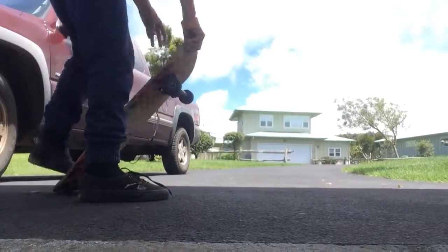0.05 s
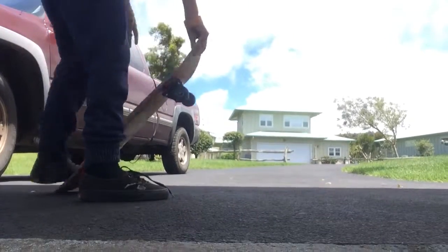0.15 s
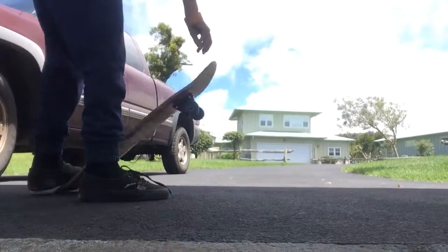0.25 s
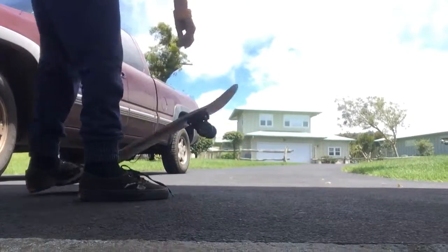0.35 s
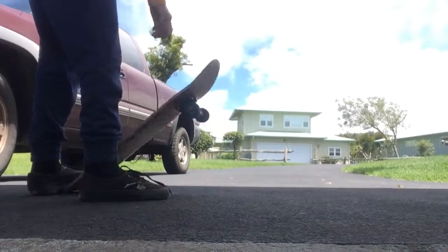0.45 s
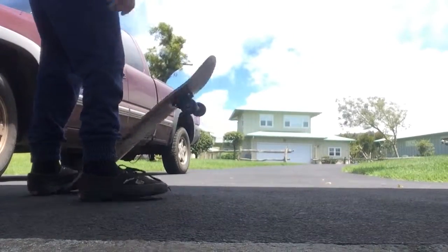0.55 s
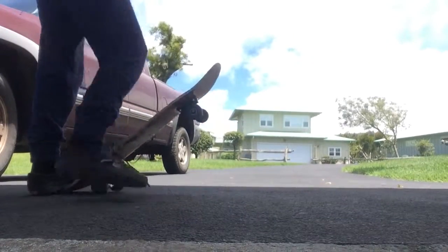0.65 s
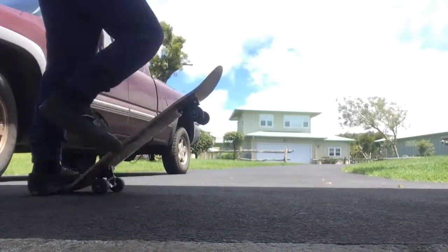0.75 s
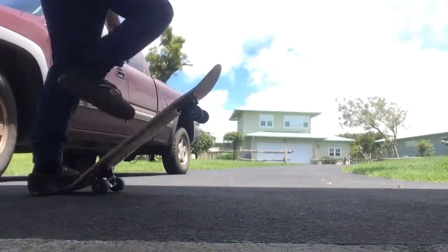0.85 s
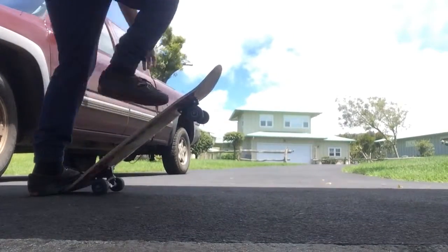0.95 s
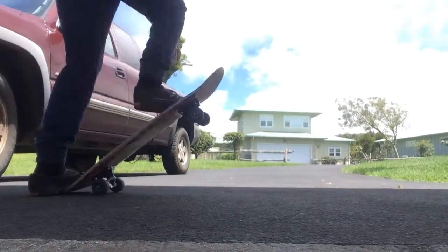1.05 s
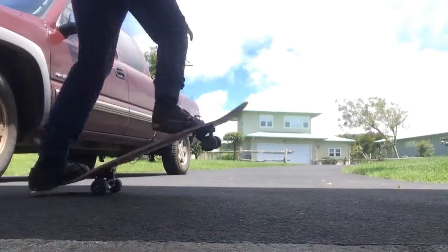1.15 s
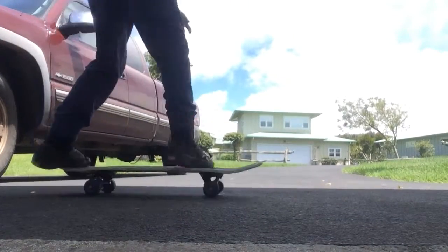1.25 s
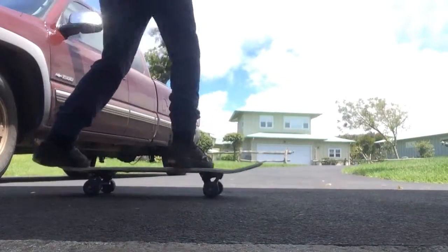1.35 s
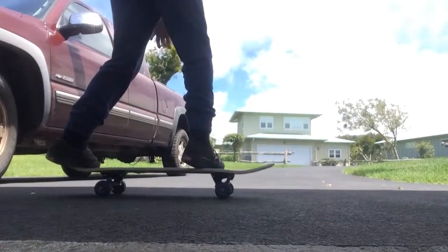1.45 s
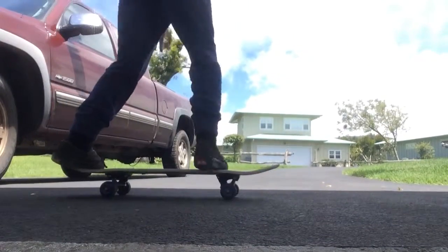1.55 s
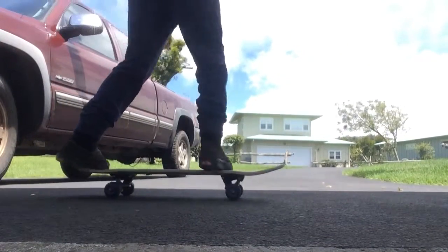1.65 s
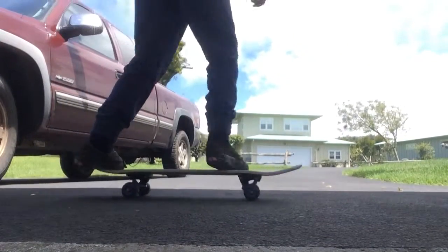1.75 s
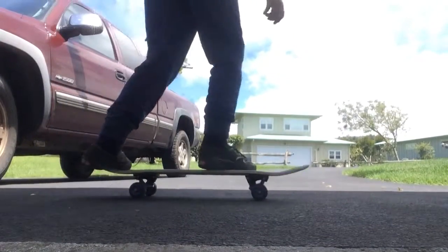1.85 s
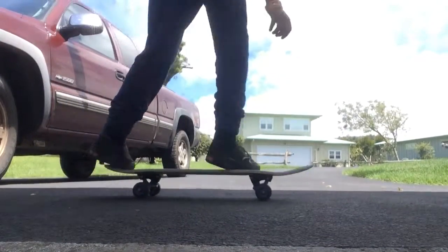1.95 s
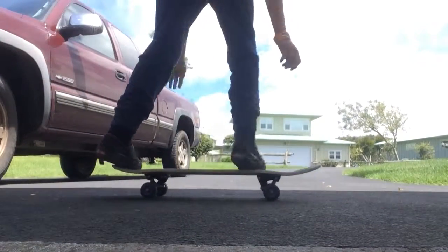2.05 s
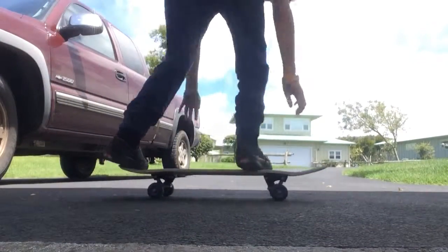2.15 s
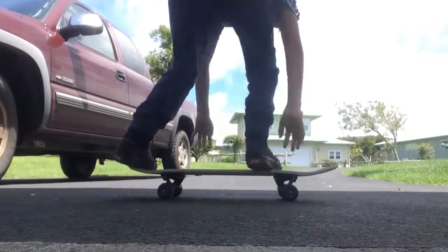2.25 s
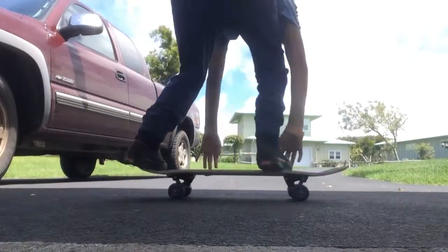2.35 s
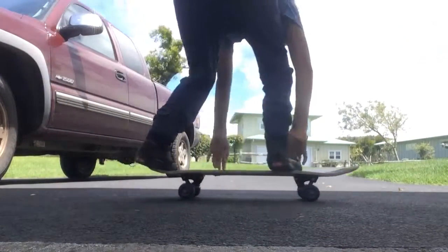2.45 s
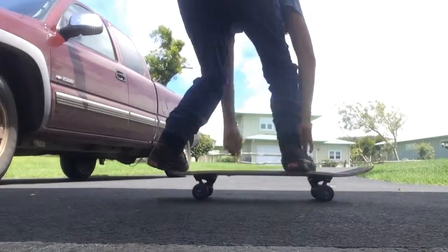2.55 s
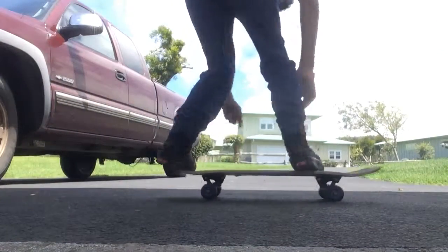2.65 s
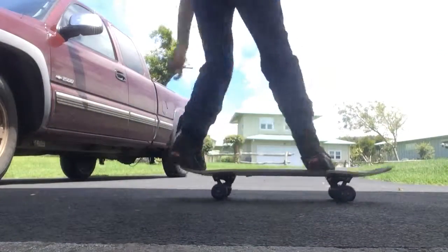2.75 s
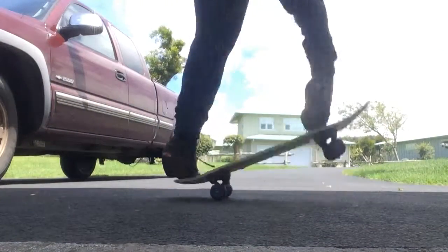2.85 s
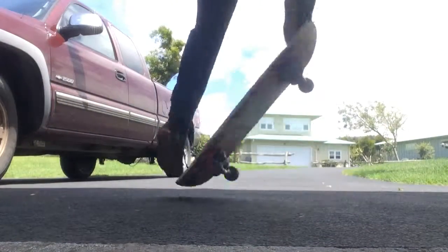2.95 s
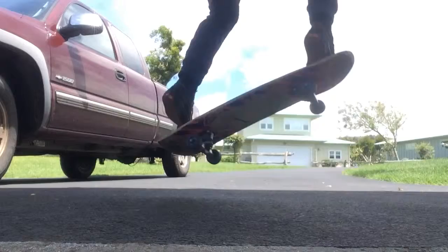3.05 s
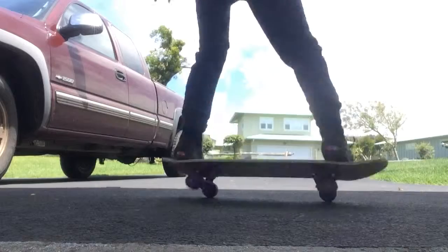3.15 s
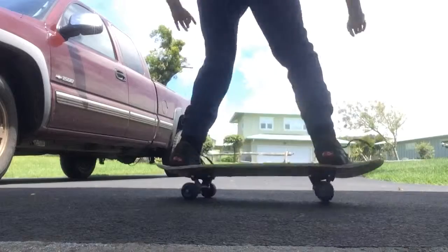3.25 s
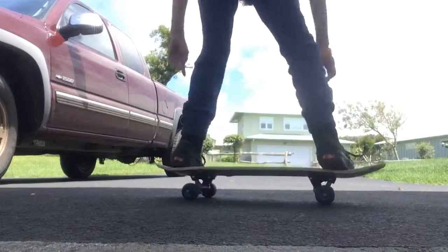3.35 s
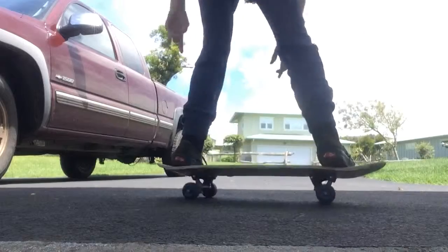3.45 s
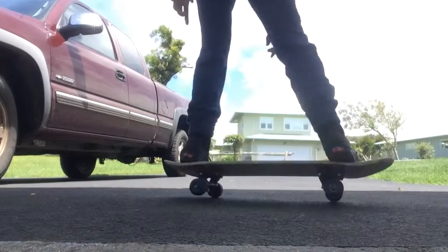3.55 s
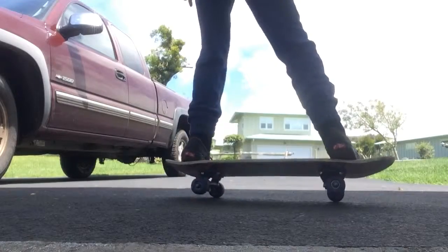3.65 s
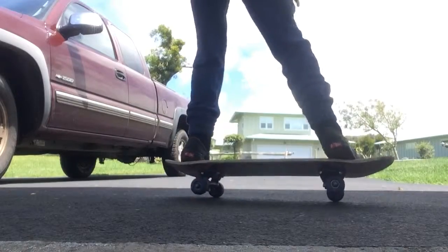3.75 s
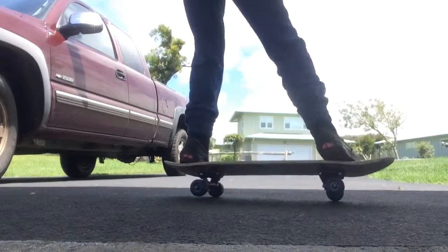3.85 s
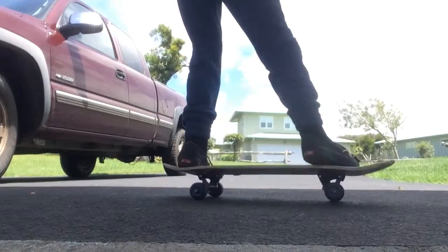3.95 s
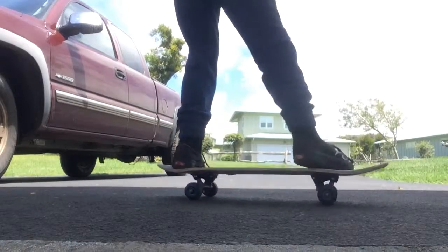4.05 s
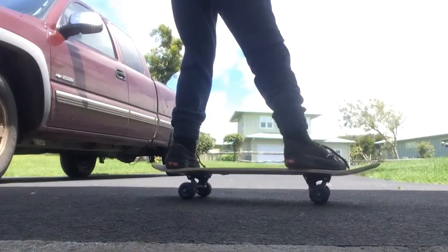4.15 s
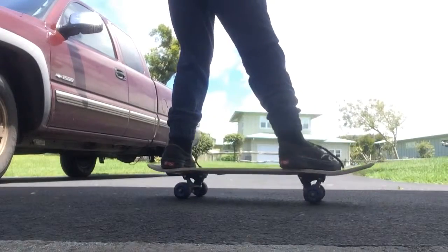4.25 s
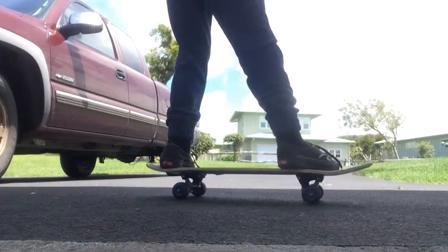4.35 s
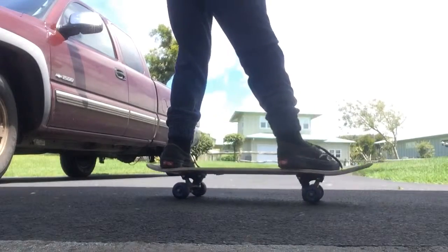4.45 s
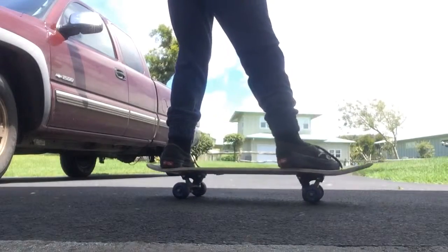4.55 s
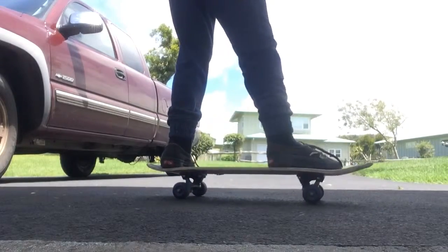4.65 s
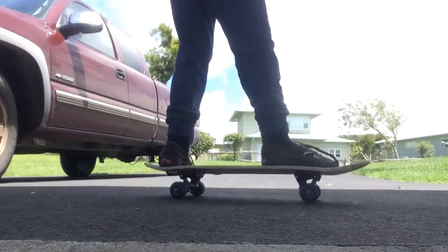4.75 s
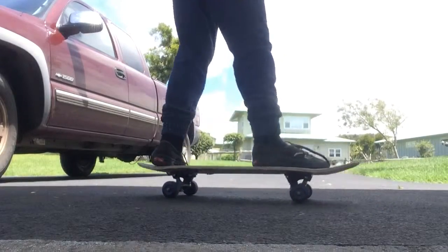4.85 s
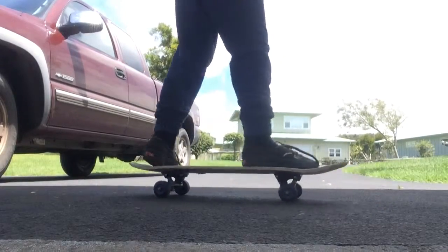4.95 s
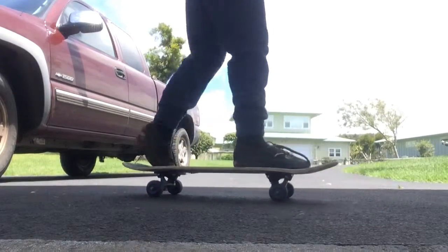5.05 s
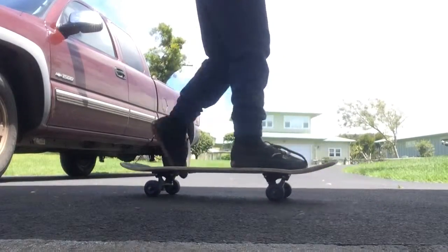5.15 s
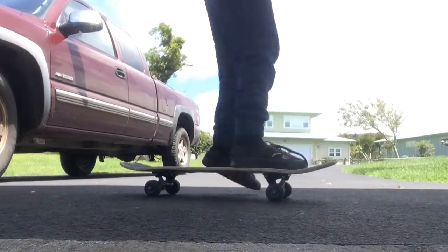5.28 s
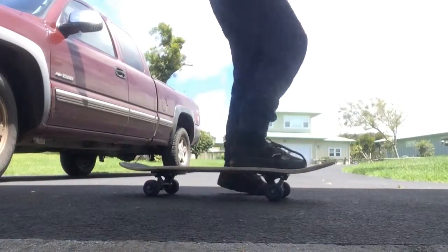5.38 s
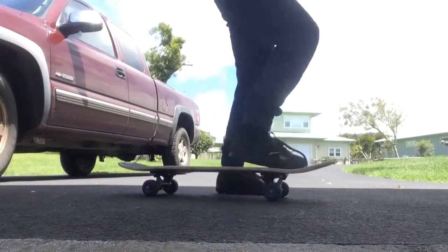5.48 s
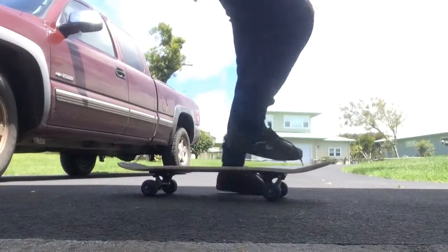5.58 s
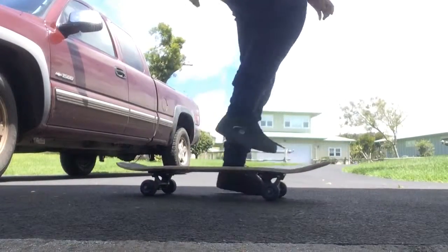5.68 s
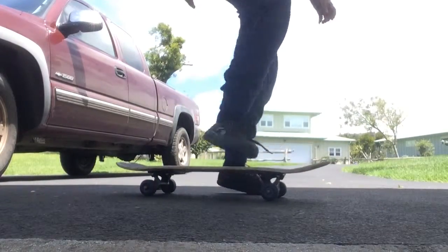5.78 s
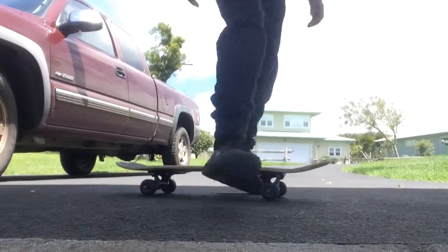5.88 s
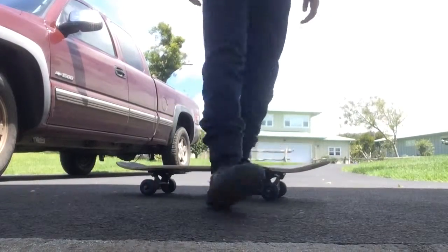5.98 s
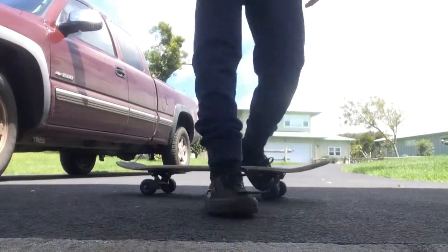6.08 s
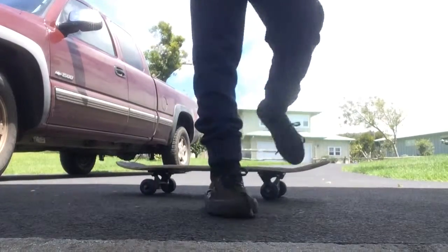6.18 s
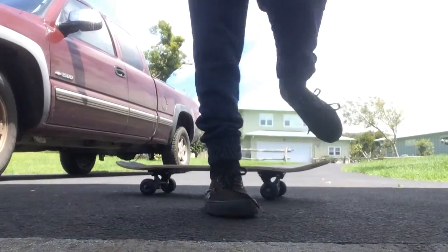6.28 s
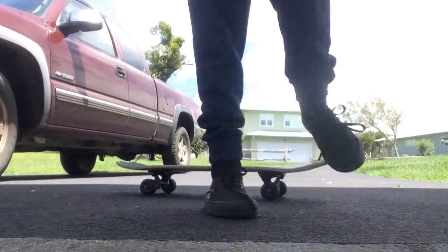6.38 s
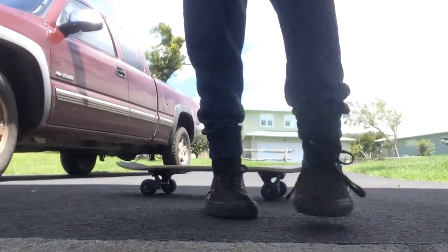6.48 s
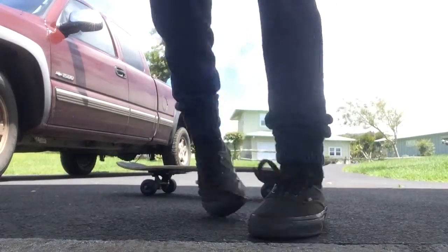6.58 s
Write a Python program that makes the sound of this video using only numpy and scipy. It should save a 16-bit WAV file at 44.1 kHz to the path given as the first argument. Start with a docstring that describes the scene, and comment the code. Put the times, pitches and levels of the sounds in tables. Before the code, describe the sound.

Outdoors on an asphalt drive, a microphone on the ground about a metre away hears a skateboard's tail knock and rattle, then the front wheels slap down. Shoes scuff the grip tape over a faint low roll while wind buffets the microphone. A sharp wooden pop, a brief airborne gap, and a hard, multiple-impact landing follow. Then it quietens to soft scuffs, low footfalls and a small bird chirping.

```python
"""A skateboard on an asphalt drive, a metre from a microphone on the ground: the tail knocks, the front wheels
slap down, the board rolls, a gust buffets the microphone, the board pops an ollie and lands hard, and the rider
steps off while a small bird chirps. Shoes scuff the grip tape throughout; faint echoes return from a parked truck
and houses. Blows are decaying modes and noise, scuffs, wheels and wind are shaped noise, the bird is swept sines.
The recorder's gain ducks after loud blows."""
import sys
import numpy as np
from scipy import signal
from scipy.fft import rfft, irfft
from scipy.io import wavfile
from scipy.ndimage import uniform_filter1d, minimum_filter1d

SR = 44100
rng = np.random.default_rng(int(sys.argv[2]) if len(sys.argv) > 2 else 0)


def wrap_up_sound(samples):
    """Save the sound to the file named by the first command line argument, as 16-bit audio."""
    columns = np.atleast_2d(samples).T
    # keep every value between -1 and 1, then stretch to whole-number steps
    tamed = np.clip(columns, -1, 1)
    steps = np.round(tamed * 32767).astype(np.int16)
    wavfile.write(sys.argv[1], SR, steps)


N = 291894
TIME = np.arange(N) / SR


def undb(db):
    """Decibels to gain."""
    return 10 ** (np.asarray(db) / 20)


def unit(x):
    """Scale to rms 1."""
    return x / np.sqrt(np.mean(x ** 2) + 1e-20)


def unit_attack(x):
    """Scale a hit to rms 1 over its first fiftieth of a second."""
    return x / np.sqrt(np.mean(x[:SR // 50] ** 2) + 1e-20)


def fade(t, t60):
    """Exponential free decay, 60 dB in t60 seconds."""
    return np.exp(-np.log(1000) * t / max(t60, 1e-3))


def band(x, lo_hz, hi_hz, order=3):
    """Causal Butterworth band-pass."""
    edges_hz = [lo_hz, min(hi_hz, SR / 2 - 100)]
    return signal.sosfilt(signal.butter(order, edges_hz, "band", fs=SR, output="sos"), x)


def colour(x, points):
    """Minimum-phase filter with a (f/Hz, gain/dB) outline."""
    hz, db = np.transpose(points)
    size = 2048
    grid_hz = np.arange(size // 2 + 1) * SR / size
    gain_db = np.interp(np.log(grid_hz + 1), np.log(hz), db)
    cepstrum = irfft(np.log(undb(gain_db)))
    # fold the cepstrum to make the response causal
    cepstrum[1:size // 2] *= 2
    cepstrum[size // 2 + 1:] = 0
    response = irfft(np.exp(rfft(cepstrum)))
    return signal.fftconvolve(x, response)[:len(x)]


def walk(count, rate):
    """Smoothed random steps, rate a second, rms 1."""
    hold = max(int(SR / rate), 1)
    steps = np.repeat(rng.standard_normal(count // hold + 1), hold)
    return unit(uniform_filter1d(steps, hold)[:count])


def grains(count, rate, rough_db):
    """Noise that comes in uneven little bursts, rms 1."""
    return unit(rng.standard_normal(count) * undb(rough_db * walk(count, rate)))


def rattle(count, rate):
    """Lone clicks of uneven size and random sign, on average rate a second, rms 1."""
    clicks = rng.random(count) < rate / SR
    return unit(clicks * rng.choice([-1, 1], count) * (.5 + rng.random(count)))


def swell(x, length):
    """A smooth rise and fall of a sound of rms 1: four lengths in all, above half height for one."""
    u = np.linspace(-2, 2, min(int(4 * length * SR), len(x)))
    window = 1 / np.cosh(2 * np.arccosh(2) * u)
    return unit(x[:len(u)] * window) * np.sqrt(np.mean(window ** 2))


def add(out, s, x):
    """Mix x in at time s."""
    i = max(int(s * SR), 0)
    out[i:i + len(x)] += x[:max(N - i, 0)]


def blow(wood_db, thud_db, clack_db, metal_db, wood_hz, clack_hz, t60, push_db, bite_db):
    """One contact: a sharp push, then the deck's modes and a dense chatter of wheels and hardware."""
    # plywood deck on its trucks: f/Hz, level/dB, t60/s
    deck = [(179, -6.5, 0.13), (239, -7.5, 0.22), (334, 7, 0.097), (378, -3, 0.14), (444, -17, 0.15),
            (550, 1, 0.085), (572.4, 2, 0.11), (648, 1, 0.12), (701, 4, 0.076), (749, -1.5, 0.16),
            (837, 2.5, 0.17), (947, 3, 0.13), (1140, -11, 0.22), (1298, -4, 0.14), (1547, 0, 0.13),
            (1568, -1.5, 0.12), (1680, -4, 0.068), (1978, -10.5, 0.074), (2110, 0.5, 0.083),
            (2250, -7, 0.15), (2326, -11, 0.13), (2900, -17, 0.14), (3070, -19, 0.066)]
    # dense overtones of deck, wheels and hardware: f/Hz, gain/dB
    dense = [(60, -15), (130, 6.5), (400, 6), (900, -4.5), (1100, -4.5), (1550, -6.5), (2200, -10),
             (2700, -13.5), (3500, -20.5), (4800, -18.5), (6800, -20.5), (9000, -17), (11500, -17),
             (15000, -18.5)]
    metal_ring_hz = 11500  # one bright steel ring, shared by all blows for simplicity
    t = np.arange(SR // 2) / SR

    hz, db, mode_t60 = np.transpose(deck)[:, :, None]
    strayed_hz = hz * (1 + 0.0016 * rng.standard_normal(hz.shape))  # each mode strays slightly at random
    phase = 2 * np.pi * (strayed_hz * t + rng.random(hz.shape))
    modes = (undb(db) * np.sin(phase) * np.exp(-np.log(1000) * t / mode_t60)).sum(axis=0)

    clicks = band(rattle(len(t), rate=710), 6300, 11800, order=1)
    hardware = grains(len(t), rate=790, rough_db=0.5) + 1.3 * clicks
    # steel cracks at the instant of contact
    crack = band(rng.standard_normal(len(t)), 8300, 16650, order=2) * fade(t, 0.018)
    chatter = colour(hardware * fade(t, t60) + 2.1 * crack, dense)
    # the contact lasts a fraction of a millisecond, so the push is duller than the rattle
    push = band(colour(signal.unit_impulse(len(t)), dense), 65, 2200, order=1)
    x = undb(-5.5) * unit_attack(modes) + unit_attack(chatter) + undb(push_db) * unit_attack(push)

    # where the board is struck decides which wood and clack resonances answer most
    for ring_hz, boost in ((wood_hz, .9), (clack_hz, .9), (metal_ring_hz, .6)):
        x = x + boost * band(x, ring_hz / 1.058, ring_hz * 1.056, order=1)
    # bare wood on asphalt bites; soft wheels and soles dull the top of the clack
    x = colour(x, [(2350, 0), (2650, bite_db), (4000, bite_db), (5500, 0)])

    # the rider's weight gives the thud, plywood the knock and clack, steel the bright edge
    edges_hz = [75, 380, 1150, 4400, 16000]
    spectrum, f = rfft(x), np.arange(len(x) // 2 + 1) * SR / len(x)
    outline = []
    for part_db, lo, hi in zip((thud_db, wood_db, clack_db, metal_db), edges_hz, edges_hz[1:]):
        attack = np.std(irfft(spectrum * ((f > lo) & (f < hi)))[:SR // 50])
        lift_db = part_db - 20 * np.log10(attack)
        outline += [(lo * 1.2, lift_db), (hi / 1.2, lift_db)]
    return colour(x, outline)


def board():
    """All knocks, the pop and the landing, plus short noise ticks of grit and loose washers."""
    # blows on the board: t/s, wood/dB, thud/dB, clack/dB, metal/dB, wood ring f/Hz, clack ring f/Hz,
    # chatter t60/s, first push re chatter/dB, bite of a hard contact/dB
    blows = [ (.152, -45, -55, -51, -66, 805, 1440, .23, -0.5, 2),
             (0.3345, -28, -32.5, -28, -49, 400, 1260, 0.093, -16, -2.5),
             (0.3419, -30, -33, -30.5, -39.5, 870, 1780, .13, -11, 1),
             (.514, -26, -41, -34, -44, 940, 1290, 0.18, -1, 1),
             (.537, -38, -51, -35.5, -52, 453, 1600, 0.13, -2, -4),
             (.63, -37.5, -43, -39, -46.5, 920, 2250, .25, -21, 2),
             (0.6748, -37.5, -41, -35, -44.5, 484, 1580, 0.037, 8.5, 6),
             (.686, -34, -44, -32, -42, 830, 2320, .14, -3.5, 1.5),
             (.878, -45, -47.5, -53, -81, 780, 1710, 0.23, -20, -15),
             (1.117, -37.5, -39.5, -34, -43.5, 786, 2470, 0.14, -8, -4),
             (1.3141, -23, -27.5, -23, -29, 800, 1550, 0.14, -2, -8),
             (1.3188, -16.5, -24, -19.5, -27, 770, 2150, 0.15, -14, 2),
             (2.9535, -13.5, -33, -12, -34, 900, 1670, 0.15, -9, 4.5),
             (2.9615, -14, -29, -30.5, -27.5, 670, 3400, 0.18, -5, 10),
             (3.158, -24, -29, -30, -40, 434, 2200, 0.29, -12, -2),
             (3.1665, -22, -30, -23.5, -33.5, 800, 3000, 0.16, -5, 3.5),
             (3.2132, -12.5, -15, -19, -24, 408, 2000, 0.2, -1, 1),
             (3.230, -17, -19, -22.5, -30, 327, 1620, 0.17, 2.5, 6.5),
             (3.2455, -12, -28.5, -28.5, -36, 690, 1570, 0.084, 3.5, 9),
             (3.422, -45.5, -63, -41.5, -52, 880, 1810, 0.094, 5, -1),
             (3.806, -53, -44, -64, -75, 950, 1300, .07, -2, -4),
             (3.9593, -30.5, -27.5, -30, -41.5, 720, 2250, .14, 2.5, 0),
             (6.035, -59, -59, -56.5, -70, 900, 2370, .06, 5, 12),
             (6.588, -44, -42.5, -60.5, -57, 600, 1790, 0.11, -23, -8)]
    # grit and loose washers: t/s, peak/dB
    ticks = [(0.3542, -18.5), (0.4256, -31.5), (.754, -35), (1.1073, -22.5), (1.474, -28), (1.7714, -29.5),
             (1.9594, -28), (2.1255, -29), (2.1662, -30.5), (2.199, -28.5), (2.8496, -14.5),
             (2.9985, -10.5), (3.3382, -22.5), (4.0854, -27), (4.1259, -25.5), (4.2094, -34.5)]
    tick_outline = [(300, 9), (1500, 5.5), (3000, 4.5), (6000, -9), (11500, -2), (15000, -4.5)]
    out, t = np.zeros(N), np.arange(SR // 10) / SR
    for s, *contact in blows:
        add(out, s, blow(*contact))
    for s, db in ticks:
        decay = fade(t, 0.0028) + undb(-19.5) * fade(t, 0.13)
        tick = colour(rng.standard_normal(len(t)) * decay, tick_outline)
        add(out, s, undb(db) * tick / np.abs(tick).max())
    return out


def scuffs_and_thuds():
    """Rubber catches on the grit of the tape and rings the board; weight comes down in low thuds."""
    # soles rubbing on grip tape: middle t/s, half-height length/s, rasp level/dB, loudest resonance f/Hz
    scuffs = [(1.19, 0.059, -41.5, 3230), (1.507, 0.049, -46, 3080), (1.645, .037, -60, 2960),
              (1.784, 0.042, -54.5, 3200), (1.841, 0.065, -52, 1700), (1.97, 0.032, -46.5, 3120),
              (2.184, 0.06, -54.5, 3070), (2.81, 0.03, -35, 3900), (2.855, 0.033, -39.5, 3100),
              (2.94, .045, -52, 2900), (4.073, 0.069, -49, 2000), (4.283, 0.04, -53.5, 2010),
              (4.702, 0.043, -48.5, 2690), (4.737, 0.025, -42, 1670), (5.142, 0.082, -51, 1780),
              (5.258, 0.053, -51, 1780), (5.405, .027, -48.5, 2500), (6.602, 0.02, -55, 2750)]
    # rasp outline: f/Hz, gain/dB
    rasp_outline = [(250, -13), (500, -2.5), (800, -1), (1100, -5), (1700, 0.5), (2400, -2.5), (3500, -2.5),
                    (4800, -8.5), (7000, -13), (15000, -58.5)]
    # hiss outline: f/Hz, gain/dB
    hiss_outline = [(1500, -40), (4000, 8), (7000, 7), (9500, 8.5), (12000, 15), (15000, 4)]
    # low thuds, the weight under some knocks and the slap, and shoes on deck and ground:
    # t/s, level/dB, f/Hz, press t60/s
    thuds = [(0.171, -39, 117, 0.11), (.337, -34.5, 114, 0.091), (.895, -50, 234, 0.12),
             (1.316, -19, 205.4, 0.11), (3.96, -30.5, 232, 0.066), (1.192, -45.5, 231, 0.17),
             (1.645, -40.5, 140, 0.16), (1.829, -37.5, 128, 0.048), (3.379, -23.5, 235, 0.023),
             (3.398, -32.5, 280, 0.021), (4.779, -36.5, 213, 0.094), (5.026, -43, 211, 0.089),
             (5.275, -36.5, 198, 0.093), (5.431, -39.5, 217, 0.068), (5.928, -45, 159, 0.046),
             (6.179, -33.5, 227, 0.05), (6.287, -31, 210, 0.11), (6.441, -31, 212, 0.1)]
    # hiss re rasp at 3 kHz resonance; a quicker rub rings higher and hisses more
    scuff_hiss_db, hiss_db_per_octave = -4, 3.5
    out, t = np.zeros(N), np.arange(SR // 3) / SR
    for s, length, rasp_db, ring_hz in scuffs:
        hiss_db = rasp_db + scuff_hiss_db + hiss_db_per_octave * np.log2(ring_hz / 3000)
        catches = grains(len(t), rate=440, rough_db=3.0) * undb(0.78 * walk(len(t), rate=123.4))
        catches = catches + 0.14 * rattle(len(t), rate=190)
        rasp = colour(catches, rasp_outline)
        rasp = rasp + 1.17 * band(rasp, ring_hz / 1.18, ring_hz * 1.03, order=1)
        hiss = colour(catches, hiss_outline)
        scuff = undb(rasp_db) * swell(rasp, length) + undb(hiss_db) * swell(hiss, length)
        add(out, s - 2 * length, scuff)
    for s, db, hz, t60 in thuds:
        tone = np.sin(2 * np.pi * hz * t) * fade(t, 0.8 * t60)
        press = band(rng.standard_normal(len(t)) * fade(t, t60), 59, 1.5 * hz)
        thud = band(unit_attack(tone) + 0.92 * unit_attack(press), 28, 360)
        add(out, s, undb(db) * unit_attack(thud))
    return out


def rolling():
    """Soft wheels murmur on the asphalt in step with their speed, and fall silent in the air."""
    # speed of the board: t/s, share of top speed
    speed = [(1.32, .05), (1.7, 0.92), (2.4, 0.8), (3.85, 0.87), (4.15, 0.29), (5.1, 0.39), (5.6, .02)]
    # wheels off the ground: from t/s, to t/s
    airborne_s = (2.96, 3.16)
    rumble_db, hiss_db = -52, -70  # at top speed
    hum_hz, hum_db = 208, -52.5  # low hum of the wheels, at top speed
    airborne = (TIME > airborne_s[0]) & (TIME < airborne_s[1])
    grounded = 1 - uniform_filter1d(1. * airborne, size=SR // 100)
    hum = band(rng.standard_normal(N), hum_hz / 1.123, hum_hz * 1.076, order=2)
    wheels = undb(hum_db) * unit(hum) + murmur_and_hiss(rumble_db, hiss_db)
    return grounded * np.interp(TIME, *np.transpose(speed)) * wheels


def echoes(x, t60, delay, top_hz):
    """Diffuse reflections: decaying grainy noise that builds up over the delay, unit energy."""
    t = np.arange(SR) / SR
    diffuse = band(grains(SR, rate=470, rough_db=4.0), 152, top_hz, order=1)
    response = diffuse * fade(t, t60) * (1 - np.exp(-(t / delay) ** 2))
    return signal.fftconvolve(x, response / np.sqrt(np.sum(response ** 2)))[:N]


def wind():
    """Turbulence on the microphone port: a light breeze, one gust and single eddies of various pitch."""
    # strongest eddies: middle t/s, half-height length/s, level/dB, upper edge f/Hz
    eddies = [(1.973, .03, -24, 210), (2.008, 0.021, -22.5, 555), (2.079, 0.032, -27.5, 263),
              (2.12, .013, -23.5, 487), (2.125, 0.039, -19.5, 152), (2.361, 0.096, -34, 137),
              (2.575, .04, -33, 111), (2.708, 0.061, -23.5, 154), (2.829, 0.05, -16.5, 116),
              (2.864, .019, -20.5, 520), (2.92, 0.059, -34, 190), (3.041, 0.035, -20.5, 178),
              (3.1, 0.027, -20, 152), (3.205, 0.027, -25, 129), (3.375, 0.037, -29, 154),
              (5.98, .1, -39.5, 160)]
    breeze_db = -53
    gust_s, gust_peak_db, rise_db_per_s, fall_db_per_s = 2.97, -34.5, 18, 40
    outline = [(15, -43), (30, -4), (55, 4), (110, 5.5), (200, -4.5), (330, -7.0), (800, -47.5)]
    out = unit(colour(grains(N, rate=18, rough_db=1.0), outline))
    gust_db = gust_peak_db - np.maximum(rise_db_per_s * (gust_s - TIME), fall_db_per_s * (TIME - gust_s))
    out *= np.hypot(undb(breeze_db), undb(gust_db))
    for s, length, db, edge_hz in eddies:
        eddy_outline = [(20, -30), (38, -17), (54, 1), (edge_hz, -3),
                        (2 * edge_hz, -21), (4 * edge_hz, -41), (16 * edge_hz, -70)]
        eddy = colour(rng.standard_normal(SR), eddy_outline)
        add(out, s - 2 * length, undb(db) * swell(eddy[SR // 2:], length))  # skip the filter's onset
    return out


def bird():
    """Calls of quick fluttering sweeps with a faint overtone, arriving by many paths through the trees."""
    # strokes of a call: t re loudest stroke/s, length/s, start f/Hz, middle f/Hz, end f/Hz, level re call/dB
    strokes = [(-.06, 0.071, 5300, 6220, 7300, -20), (-.02, 0.024, 3500, 4600, 4700, -7.5),
               (0, .03, 4950, 4530, 3720, -1), (0.027, .048, 3900, 4850, 4450, -9),
               (0.059, 0.033, 3200, 4020, 4740, -7)]
    # calls: t/s, level ahead of the paths/dB, pitch factor
    calls = [(4.78, -52.5, 1.03), (5.815, -63, 0.97), (6.186, -44, 1), (6.44, -60, .72)]
    out = np.zeros(N)
    for s, call_db, factor in calls:
        for offset, length, *pitches, db in strokes:
            u = np.linspace(0, 1, int(length * SR))
            sweep_hz = factor * np.polyval(np.polyfit([0, .5, 1], pitches, 2), u)
            hz = sweep_hz * (1 + 0.029 * walk(len(u), rate=900))
            flutter_db = 2.0 * walk(len(u), rate=290)
            loudness = undb(call_db + db + flutter_db) * np.sqrt(np.abs(np.sin(np.pi * u)))
            phase = 2 * np.pi * np.cumsum(hz) / SR
            add(out, s + offset, loudness * (np.sin(phase) + undb(-24) * np.sin(2 * phase)))
    early = echoes(out, t60=0.098, delay=0.0018, top_hz=9000)
    late = echoes(out, t60=0.26, delay=0.0077, top_hz=9000)
    return 0.91 * out + 0.65 * early + 0.38 * late


def murmur_and_hiss(rumble_db, hiss_db):
    """A low murmur under a fine hiss: two coloured grainy noises, each at its own level."""
    # murmur outline: f/Hz, gain/dB
    rumble_outline = [(71, -37), (120, -9.5), (207, -3.5), (316, -12), (489, -9.5), (537, -15),
                      (589, -11.5), (1120, -21), (1790, -23.5), (2990, -32.5), (5000, -40.5), (6500, -76),
                      (11000, -120)]
    # hiss outline: f/Hz, gain/dB
    air_outline = [(1760, -24), (3000, -0.5), (3510, -1.5), (5160, -4.5), (5610, -3.5), (7280, -6),
                   (13700, -6.5), (15500, -13)]
    rumble = unit(colour(grains(N, rate=28, rough_db=2.55), rumble_outline))
    hiss = unit(colour(grains(N, rate=89, rough_db=0.5), air_outline))
    return undb(rumble_db) * rumble + undb(hiss_db) * hiss


def outdoors():
    """The open air, low murmur and high hiss, growing slowly quieter."""
    murmur_start_db, murmur_fall_db_per_s = -51, .35
    air_start_db, air_fall_db_per_s = -62.5, 1.0
    return murmur_and_hiss(murmur_start_db - murmur_fall_db_per_s * TIME,
                           air_start_db - air_fall_db_per_s * TIME)


def scene():
    """Board and shoes close by with echoes from truck and houses, wind on the port, the bird further off."""
    near = board() + scuffs_and_thuds()
    far = undb(-37.5) * echoes(near, t60=0.48, delay=0.15, top_hz=4000)
    return (near + far + wind() + rolling() + outdoors() + bird())[None]


def gain_control(x):
    """Loud blows turn the gain down; it holds, then recovers. The detector rolls off below 200 Hz."""
    threshold_db, slope = -19, .5  # slope: share of any excess level taken off
    window_s, hold_s, release_s = 0.022, .25, 0.039
    power = uniform_filter1d(band(x, 200, 14500, order=2) ** 2, int(window_s * SR))
    level_db = 10 * np.log10(np.abs(power) + 1e-12)
    cut_db = -slope * np.maximum(level_db - threshold_db, 0)
    hold = int(hold_s * SR)
    held_db = minimum_filter1d(cut_db, hold, origin=(hold - 1) // 2)
    step = 1 / (release_s * SR)
    released_db = signal.lfilter([step], [1, step - 1], held_db)
    return x * undb(np.minimum(held_db, released_db))  # instant attack, slow release


def record(dry):
    """The recorder sheds the deepest bass, ducks after loud blows, rounds the highest peaks and cuts the top."""
    ceiling, top_hz = .9, 15400
    high_pass = signal.butter(2, 28, "high", fs=SR, output="sos")
    low_pass = signal.ellip(8, .2, 70, top_hz, fs=SR, output="sos")
    x = gain_control(signal.sosfilt(high_pass, dry[0]))
    rounded = ceiling * np.tanh(x / ceiling)
    return signal.sosfilt(low_pass, rounded)[None]


dry = scene()
out = record(dry)
wrap_up_sound(out)
```